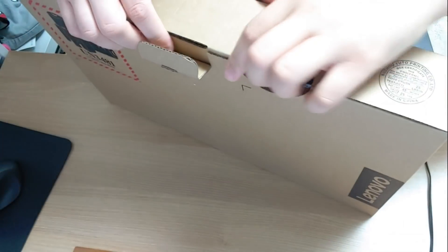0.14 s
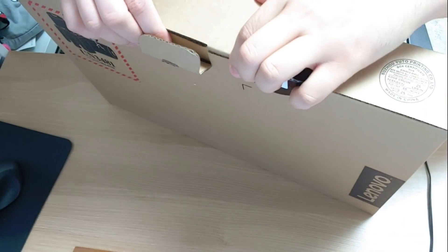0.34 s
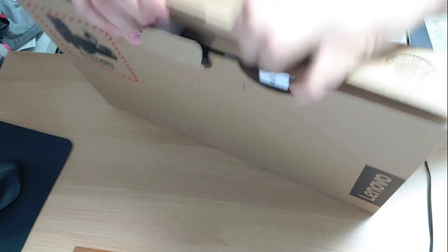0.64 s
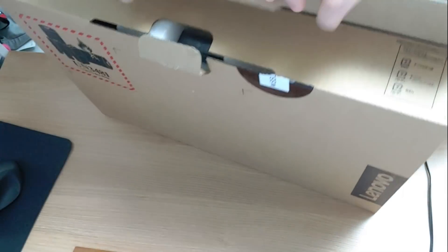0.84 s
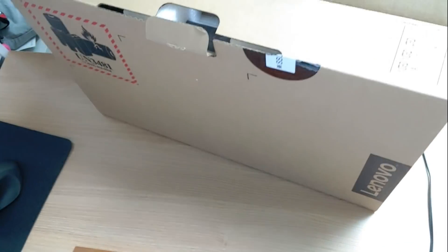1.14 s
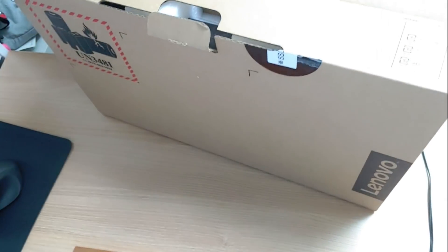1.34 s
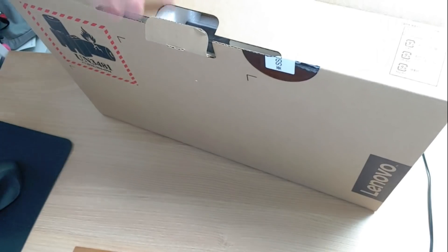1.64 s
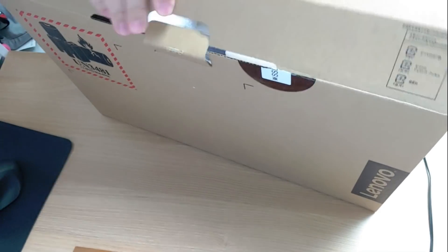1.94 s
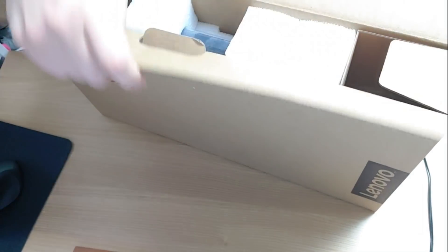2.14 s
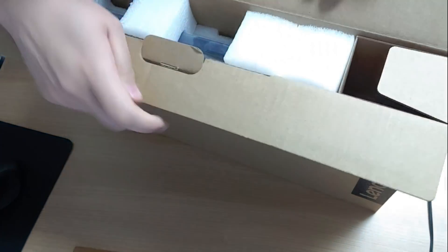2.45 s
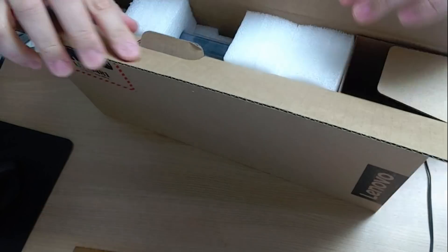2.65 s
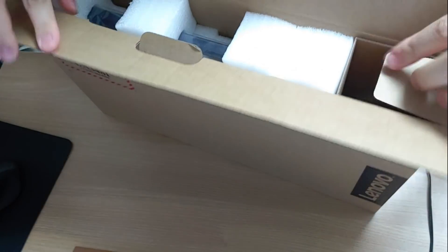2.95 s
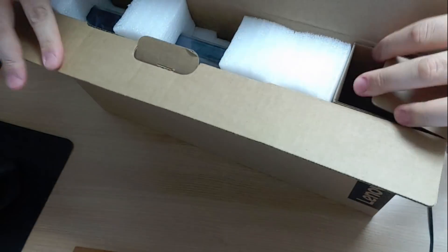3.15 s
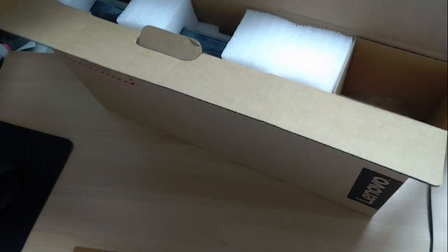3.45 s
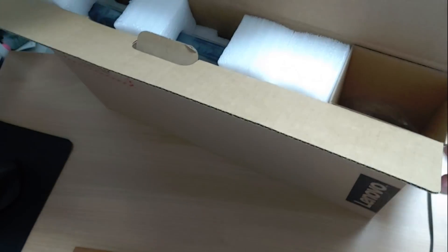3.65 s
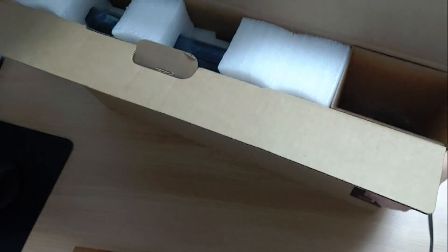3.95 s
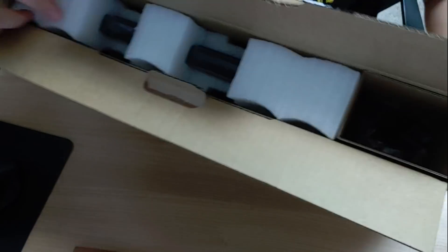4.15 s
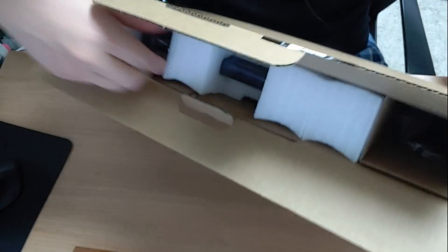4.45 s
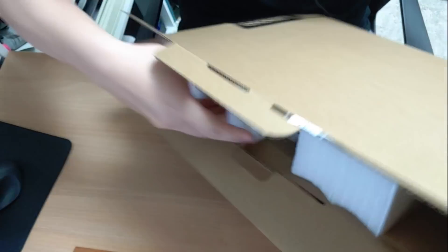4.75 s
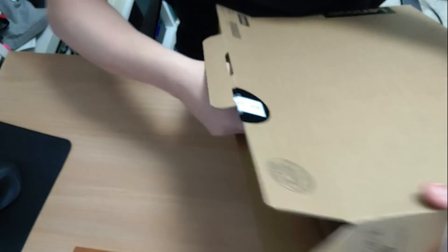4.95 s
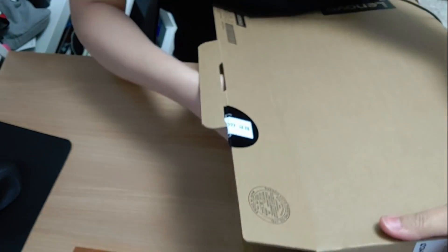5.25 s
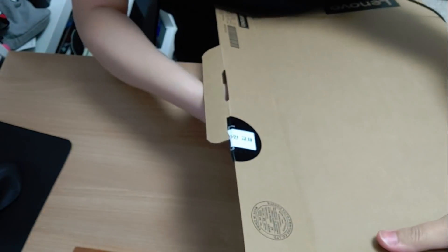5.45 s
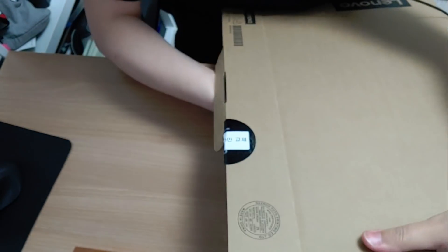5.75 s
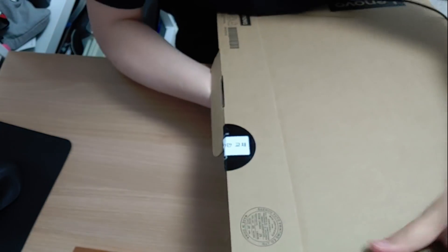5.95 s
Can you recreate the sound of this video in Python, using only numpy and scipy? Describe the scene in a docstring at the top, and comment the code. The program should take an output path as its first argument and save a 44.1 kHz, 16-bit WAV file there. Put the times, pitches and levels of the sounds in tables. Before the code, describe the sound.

Close, dry cardboard handling: a sharp tearing crack near the start, crisp creaks and rustling scrapes, then heavier sliding and a late double pop.

```python
"""A desk in a quiet room: a corrugated cardboard box is opened close to a small microphone.
Tabs and creases snap: noise bursts through resonances; the room answers them with a noise tail.
Stiff flaps scrape over each other and over foam: grainy noise through surface, panel and desk modes.
The box slides and bumps on the desk top: short low cycles and one slow sway.
Steady room tone lies below; a soft band-coloured rush fades out by 1 s."""
import sys
import numpy as np
from scipy import signal
from scipy.fft import rfft, irfft, next_fast_len
from scipy.io import wavfile
from scipy.ndimage import uniform_filter1d, map_coordinates

SR = 44100
rng = np.random.default_rng(int(sys.argv[2]) if len(sys.argv) > 2 else 0)


def int16_out(signal):
    """Quantize to a 16-bit WAV file."""
    q = np.round(np.clip(np.atleast_2d(signal).T, -1, 1) * 32767)
    wavfile.write(sys.argv[1], SR, q.astype(np.int16))


N = 268833  # samples

# room tone spectrum, relative: [f/Hz, level/dB per Hz]
AIR_SPECTRUM = [(24, -41.5), (40, 2.5), (297, -12), (585, -8.5), (1950, -21), (2380, -5.5), (8130, -24),
                (16000, -20)]
AIR_DB = -83

# modes of the soft rush: [f/Hz, width/Hz, level/dB]
DRONE_MODES = [(340, 300, -2), (825, 155, -2), (1570, 160, -5.5), (2920, 250, -2.5)]
DRONE_DB, DRONE_END_S, DRONE_FADE_S = -62.5, 1, .03

# strokes of hands and flaps over the board: [t at full strength/s, swell/s, hold/s, fade/s,
# surface hiss/dB, panel sound/dB, load on box and desk/dB]
STROKES = [(0.0, 0.086, 0.26, .3, -63, -59.5, -65.5), (0.23, 0.045, 0.017, 0.11, -63, -57.5, -61),
           (0.383, .1, 0.19, 0.2, -72.5, -67, -72), (0.696, 0.17, 0.22, 0.2, -72, -57.5, -59.5),
           (0.906, 0.045, 0.068, 0.066, -45, -40, -51.5), (1.033, .1, 0.24, 0.02, -63, -62, -62.5),
           (1.323, 0.044, 0.41, 0.28, -63, -59, -65), (1.515, 0.028, 0.12, 0.19, -55, -56.5, -69),
           (1.768, 0.061, 0.038, 0.057, -67.5, -57, -69.5), (1.973, 0.05, 0.051, 0.076, -64.5, -64.5, -66),
           (2.198, 0.11, 0.029, 0.059, -61.5, -58, -59.5), (2.27, 0.026, 0.019, 0.26, -62, -60, -58.5),
           (2.49, 0.14, 0.018, 0.064, -58, -59, -68), (2.663, 0.035, 0.062, 0.21, -64.5, -56, -60.5),
           (2.91, 0.21, 0.069, 0.47, -54.5, -55.5, -65.5), (3.117, 0.094, 0.18, 0.11, -57, -55.5, -59),
           (3.492, 0.24, 0.084, 0.076, -58.5, -59, -65.5), (3.728, 0.21, 0.19, 0.48, -60.5, -59, -62.5),
           (3.974, 0.046, 0.15, 0.14, -65.5, -58.5, -61.5), (4.332, 0.11, 0.13, 0.14, -49, -53, -48.5),
           (4.642, 0.37, 0.045, 0.12, -54, -49, -52), (4.744, 0.45, 0.099, 0.6, -55, -59, -66),
           (5.171, 0.29, 0.097, 0.031, -50.5, -48.5, -53.5), (5.311, 0.055, 0.01, 0.06, -79, -55.5, -57.5),
           (5.458, 0.15, 0.016, 0.12, -61.5, -55.5, -53), (5.586, 0.11, 0.25, 0.078, -72.5, -68.5, -71.5),
           (5.903, 0.18, 0.044, 0.15, -57, -49, -59), (6.044, 0.056, .05, .1, -88, -64.5, -55)]
STROKE_DEPTH_DB = 20  # gained over the swell, lost over the fade
# hands only resting on the box: [hiss/dB, panel/dB, load/dB]
REST_LEVELS_DB = [-85, -84, -74.5]
EDGE_SHARE, EDGE_DB = 0.58, -4  # edge scratch: share of the hiss level against panel level; offset
RASP_DB = 1.3  # wavering hand pressure, separate for each layer
DESK_DB = -3.5  # desk top relative to the load

# resonances of board surface, board edge, panels, hollow box, desk top: [f/Hz, width/Hz, level/dB]
SURFACE_MODES = [(4984, 1070, 2), (6050, 2290, 2.5), (7500, 1770, 3.5), (10480, 2500, -7),
                 (12380, 2300, -10)]
EDGE_MODES = [(2440, 2110, -3.5), (2990, 870, 4), (3910, 920, -3)]
PANEL_MODES = [(647, 85, 2.5), (773, 43, 5), (833.4, 59, 5), (988, 75, 3.5), (1195, 179, 2.5),
               (1432, 50, 5.5), (1592, 133, 1.5), (1964, 172, 0), (2280, 310, -1.5)]
HOLLOW_MODES = [(171, 88, -4.5), (251, 75, -2), (344, 79, -0.5), (480, 83, 2.5), (514, 139, 0.5)]
DESK_MODES = [(31.8, 24, -4.5), (72, 49, -2.6), (96, 36.4, -2)]

# sudden snaps, ticks and knocks: [t/s, crack peak/dB, panel peak/dB, panel f/Hz, hollow peak/dB, t60/s]
SNAPS = [(0.3314, -31, -62, 1460, -65, 0.0075), (0.345, -33.5, -79, 1560, -86, 0.02),
         (0.392, -42.5, -62, 1500, -73, 0.027), (0.6754, -54, -43, 775, -45, 0.028),
         (0.9004, -10, -4.5, 1300, -16, 0.03), (1.0931, -44, -49, 627, -54, 0.032),
         (1.3281, -27.5, -40.5, 730, -46.5, 0.015), (1.5033, -22, -49, 2160, -31, 0.058),
         (1.5118, -14, -18, 1220, -56, 0.017), (1.566, -57, -47, 900, -41.5, 0.025),
         (1.587, -41, -37, 920, -49, 0.054), (1.836, -47, -79.5, 1460, -76, 0.02),
         (1.95, -47.5, -53.5, 1190, -58, 0.026), (2.1353, -42, -56, 630, -57, 0.036),
         (2.3768, -39, -59, 1230, -69, 0.0088), (2.4034, -37.5, -51.5, 1190, -50, 0.013),
         (2.4423, -35.5, -41, 1910, -49, 0.023), (2.579, -44.5, -63, 1960, -81, 0.039),
         (2.6317, -27.5, -35, 1510, -44.5, 0.04), (2.7147, -37.5, -40, 930, -37.5, 0.035),
         (2.7364, -38, -62, 1280, -68, 0.035), (2.7514, -41, -42, 1390, -70, 0.036),
         (2.7875, -39, -80, 1650, -75, 0.068), (2.884, -44, -57, 1200, -69, 0.03),
         (2.9048, -38, -51, 1030, -67, 0.016), (2.914, -39, -46, 1030, -62, 0.021),
         (3.134, -54, -37.5, 880, -70, 0.094), (3.4049, -102, -55.5, 585, -40, 0.031),
         (3.9536, -40, -48, 680, -36.5, 0.28), (4.0114, -49, -53, 1230, -40, 0.032),
         (4.0377, -33, -53, 1360, -74, 0.046), (4.088, -35.5, -45, 1230, -51, 0.091),
         (4.398, -46, -42, 700, -43, 0.03), (4.461, -75, -38, 970, -53, 0.03),
         (4.575, -52, -69, 800, -41.5, 0.03), (4.845, -41, -45, 910, -51, 0.017),
         (4.9888, -39.5, -48.5, 638, -69, 0.1), (5.146, -55, -41, 700, -47, 0.032),
         (5.2219, -43, -45, 603, -25, 0.031), (5.4525, -25.5, -36, 1830, -23, 0.049),
         (5.4575, -34, -21.5, 1160, -25, 0.02), (5.467, -51, -17.5, 860, -31, 0.09),
         (5.511, -31.5, -41, 1800, -30, 0.036), (5.7618, -47, -47, 950, -48.5, 0.065)]
# short scuffs that swell and fade: [t/s, crack peak/dB, panel peak/dB, panel f/Hz, hollow peak/dB, t60/s]
SCUFFS = [(0.8755, -35, -37, 620, -28, 0.02), (0.9084, -9, -45, 1070, -21.5, 0.066),
          (0.9203, -12, -18.5, 1430, -19.5, 0.033), (0.9712, -25.5, -45, 730, -24.5, 0.046),
          (1.136, -41, -49, 700, -61, 0.04), (1.647, -31.5, -39, 1400, -51, 0.039),
          (1.759, -51.5, -31.5, 1244, -78, 0.045), (2.1874, -36, -55, 1120, -69, 0.13),
          (2.4656, -44.5, -44, 1480, -69.5, 0.027), (2.5104, -37.5, -62, 1710, -60, 0.075),
          (2.9294, -50, -38.5, 624, -75, 0.036), (2.9841, -35.5, -44, 2370, -76, 0.041),
          (3.021, -43, -38.5, 2500, -74, 0.051), (3.185, -42, -40.5, 900, -54, 0.05),
          (3.2554, -38, -39, 1000, -71, 0.11), (3.5524, -37.5, -39, 930, -62, 0.083),
          (3.793, -42.5, -42.5, 1320, -50, 0.025), (4.1082, -43.5, -59.5, 1102, -42, 0.073),
          (4.3224, -43, -44, 825, -54, 0.046), (4.623, -55, -39, 1540, -44, 0.023),
          (4.676, -37, -60, 1250, -43, 0.087), (5.185, -41, -34.5, 1230, -36, 0.052),
          (5.457, -53, -20.5, 620, -32.5, 0.084), (5.513, -51, -35, 635, -31.5, 0.069),
          (5.9044, -43, -38, 1570, -58, 0.088), (5.985, -62, -46, 810, -47, 0.049),
          (6.078, -60, -51, 632, -49, 0.02)]

# decay of the room's answer: [f/Hz, t60/s]
ROOM_DECAY = [(200, 0.14), (2000, 0.078), (10000, 0.053)]
ROOM_DB = -13.0

# low pushes of the box against the desk: [t/s, drive level/dB, f/Hz]
BUMPS = [(0.982, -24.5, 54.4), (1.945, -52, 60.5), (2.189, -50, 110), (2.333, -42, 37.7),
         (2.544, -61.5, 50), (3.303, -46.5, 33), (3.945, -43, 153), (4.103, -40, 105), (4.28, -56, 35.3),
         (4.352, -40, 80), (4.394, -38, 95), (4.45, -43, 80), (4.681, -43, 87), (5.216, -36.5, 71.4)]
SWAY_S, SWAY_HZ, SWAY_DB, SWAY_T60_S = 0.92, 26.9, -39, 0.63  # slow rocking of the desk

TOP_HZ = 15900  # band limit


def amp(db):
    """dB to amplitude."""
    return 10 ** (np.asarray(db) / 20)


def unit(x):
    """x scaled to rms 1."""
    return x / np.sqrt(np.mean(x ** 2) + 1e-20)


def along(points, hz):
    """(Hz, value) points interpolated on a log frequency axis."""
    f, v = np.transpose(points)
    return np.interp(np.log(hz + 1), np.log(f + 1), v)


def wobble(knots_per_s):
    """Smooth random curve through Gaussian knots."""
    knots = rng.standard_normal(int(N * knots_per_s / SR) + 4)
    return map_coordinates(knots, [np.arange(N) * knots_per_s / SR])


def filtered(x, response):
    """x times a response given as a function of frequency."""
    m = next_fast_len(N + SR // 2)
    return irfft(rfft(x, m) * response(np.fft.rfftfreq(m, 1 / SR)), m)[..., :N]


def ring(x, modes, top_hz=np.inf):
    """x through causal resonances of alternating sign, dulled above top_hz; white noise keeps its rms."""
    m = next_fast_len(x.shape[-1] + 4096)
    f = np.fft.rfftfreq(m, 1 / SR)
    h = 0
    for k, (centre_hz, width_hz, db) in enumerate(modes):
        damping = 1j * f * width_hz
        h = h + (-1) ** k * amp(db) * damping / (centre_hz ** 2 - f ** 2 + damping)
    h = h / (1 + 1j * f / top_hz - (f / top_hz) ** 2)
    h = h / np.sqrt(np.mean(np.abs(h) ** 2))
    return irfft(rfft(x, m) * h, m)[:x.shape[-1]]


def air():
    """Steady room tone: noise shaped by a fixed spectrum."""
    noise = rng.standard_normal(N)
    return amp(AIR_DB) * unit(filtered(noise, lambda hz: amp(along(AIR_SPECTRUM, hz))))


def drone():
    """Soft, even rush: noise through fixed bands, faded out at DRONE_END_S."""
    t = np.arange(N) / SR
    on = np.clip((DRONE_END_S - t) / DRONE_FADE_S, 0, 1)
    return amp(DRONE_DB) * on * ring(rng.standard_normal(N), DRONE_MODES)


def strokes():
    """Levels in dB of hiss, panel and load: every stroke swells, holds and fades; powers add."""
    step = 44  # samples between level points
    t = np.arange(0, N + step, step) / SR
    start, swell, hold, fade, *levels_db = np.transpose(STROKES)[..., None]
    before = np.maximum(start - t, 0) / swell
    after = np.maximum(t - start - hold, 0) / fade
    drop_db = STROKE_DEPTH_DB * (before + after)
    curves = []
    for db, rest_db in zip(levels_db, REST_LEVELS_DB):
        power = amp(2 * rest_db) + np.sum(amp(2 * (db - drop_db)), axis=0)
        curves.append(np.interp(np.arange(N) / SR, t, 10 * np.log10(power)))
    return curves


def fibres(grain_db, clump_db, patchy_db):
    """Friction: noise of uneven grains in clumps; narrow colour patches come and go as contact moves."""
    z = signal.stft(rng.standard_normal(N + 512), nperseg=512)[2]
    field = uniform_filter1d(rng.standard_normal(z.shape), size=3, axis=0)  # across frequency
    field = uniform_filter1d(field, size=6, axis=1)  # across time
    noise = signal.istft(z * amp(patchy_db * unit(field)), nperseg=512)[1][:N]
    force_db = grain_db * wobble(500) + clump_db * wobble(60) + RASP_DB * wobble(16)
    return unit(noise * amp(force_db))


def rubbing():
    """Sliding board hisses and scratches, sounds the panels and the hollow, and shakes the desk."""
    hiss_db, panel_db, load_db = strokes()
    edge_db = EDGE_SHARE * hiss_db + (1 - EDGE_SHARE) * panel_db + EDGE_DB
    # a fibre catches and lets go, 40 times a second on average; t60 0.63 ms
    catch = (rng.random(N) < 40 / SR) * rng.exponential(size=N)
    release = amp(-60 * np.arange(SR // 20) / SR / 0.00063)
    grip = 1 + 0.6 * signal.fftconvolve(catch, release)[:N]
    hiss = ring(amp(hiss_db) * grip * fibres(grain_db=1.0, clump_db=1.8, patchy_db=2.3), SURFACE_MODES)
    edge = ring(amp(edge_db) * grip * fibres(grain_db=1.0, clump_db=1.5, patchy_db=2.5), EDGE_MODES)
    panel = ring(amp(panel_db) * grip * fibres(grain_db=0, clump_db=2.5, patchy_db=4), PANEL_MODES)
    hollow = ring(amp(load_db) * fibres(grain_db=4.5, clump_db=1.5, patchy_db=5.0), HOLLOW_MODES)
    desk = ring(amp(load_db + DESK_DB) * fibres(grain_db=-6.0, clump_db=0.5, patchy_db=2.0), DESK_MODES)
    return hiss + edge + panel + hollow + desk


def bursts(rows, rise_s, swell, click):
    """Breaking fibres drive surface, panels and hollow; click is the extra force of the first instant."""
    out = np.zeros(N + SR)
    t = np.arange(SR // 5) / SR
    for start_s, crack_db, panel_db, pitch_hz, hollow_db, t60_s in rows:
        t60_s = np.clip(t60_s, .004, .2)
        rise = (1 - np.exp(-t / (rise_s + swell * t60_s))) ** 2  # with swell, a long burst builds slowly
        jerks = np.repeat(rng.standard_normal(len(t) // 30), 30)  # fibres give way in small jerks
        tail = rise * amp(-60 * t / t60_s + 3.6 * jerks)
        first = rise * click * amp(-60 * t / 0.0018)
        # the crease lets go in one push, slower on a low panel
        blow = 9 * click * np.exp(-((t - 1.747 * rise_s) * pitch_hz / 0.098) ** 2)
        # no two creases break alike; a whole crease is duller than single fibres
        skin = [(hz, 1.15 * width_hz, db - hz / 2400 + rng.standard_normal() * 2)
                for hz, width_hz, db in EDGE_MODES + SURFACE_MODES]
        # modes near pitch_hz, the panel under the hand, lead
        near = [(hz * (1 + 0.042 * rng.standard_normal()), width_hz, db - 14 * np.log2(hz / pitch_hz) ** 2)
                for hz, width_hz, db in PANEL_MODES]
        noise = rng.standard_normal((3, len(t)))
        layers = [(crack_db, skin, (tail + first) * noise[0]),
                  (panel_db, near, tail * noise[1] + blow),
                  (hollow_db, HOLLOW_MODES, tail * noise[2] + blow)]
        top_hz = 5999 - 250 * crack_db  # the harder the break, the duller its top
        begin = round(start_s * SR)
        for peak_db, modes, drive in layers:
            part = ring(drive, modes, top_hz)
            out[begin:begin + len(t)] += amp(peak_db) * part / np.abs(part).max()
    return out[:N]


def room(x):
    """Room answer: a noise tail, 300 samples late, each frequency dying at its own speed."""
    hz, t, z = signal.stft(rng.standard_normal(SR // 2), SR, nperseg=256)
    decay = amp(-60 * t / along(ROOM_DECAY, hz)[:, None])
    tail = signal.istft(z * decay, SR, nperseg=256)[1]
    return signal.fftconvolve(np.pad(x, (300, 0)), tail / np.linalg.norm(tail))[:N]


def bumps():
    """Soft pushes, each little more than one low cycle, and one decaying slow sway of the desk."""
    out = np.zeros(N + SR)
    t = np.arange(SR // 2) / SR
    for start_s, db, hz in BUMPS:
        cycles = t * hz
        envelope = 4 * cycles * np.exp(-2.2 * cycles ** 1.23)
        begin = round(start_s * SR)
        out[begin:begin + len(t)] -= amp(db) * envelope * np.sin(2 * np.pi * cycles)
    sway = amp(SWAY_DB - 60 * t / SWAY_T60_S) * np.sin(2 * np.pi * SWAY_HZ * t)
    begin = round(SWAY_S * SR)
    out[begin:begin + len(t)] -= sway
    return out[:N]


def scene():
    """Sum of all layers, one channel; only snaps and scuffs excite the room."""
    snaps = bursts(SNAPS, rise_s=0.000685, swell=0, click=9.3)
    scuffs = bursts(SCUFFS, rise_s=0.00076, swell=0.12, click=0)
    hits = snaps + scuffs
    mix = air() + drone() + rubbing() + hits + amp(ROOM_DB) * room(hits) + bumps()
    return mix[None]


def record(dry):
    """Microphone chain: a steep band limit at TOP_HZ."""
    return filtered(dry, lambda hz: 1 / (1 + (hz / TOP_HZ) ** 120))


dry = scene()
out = record(dry)
int16_out(out)
```